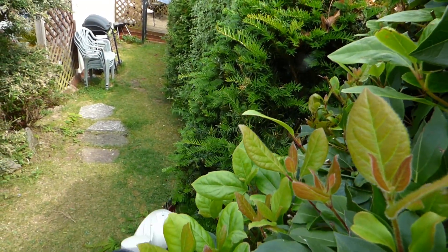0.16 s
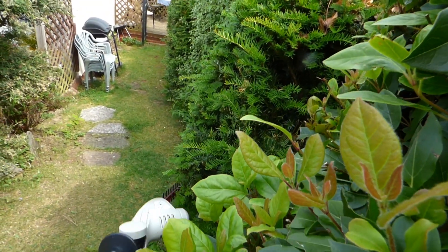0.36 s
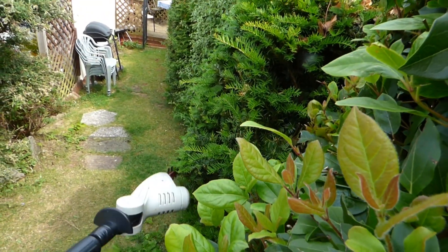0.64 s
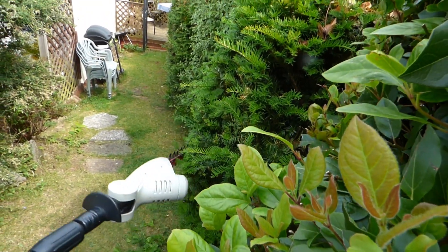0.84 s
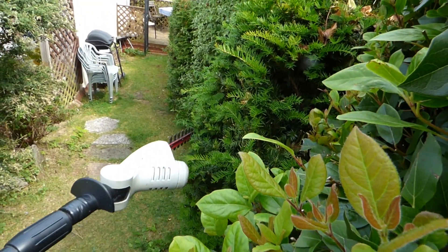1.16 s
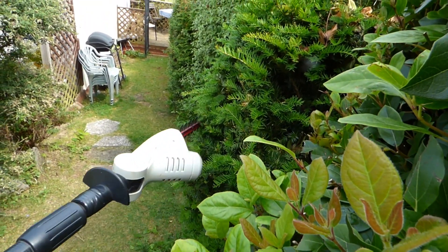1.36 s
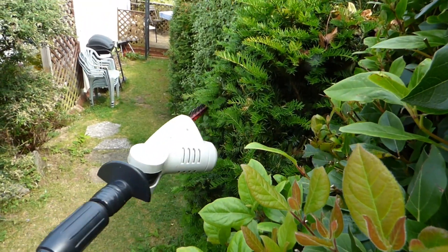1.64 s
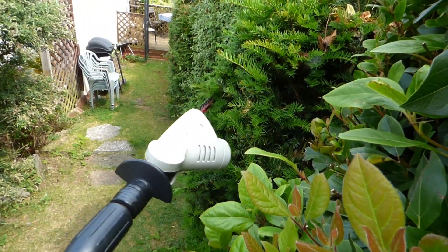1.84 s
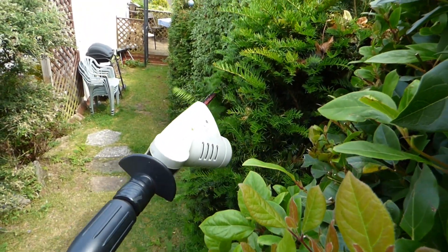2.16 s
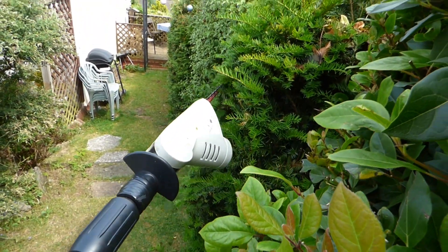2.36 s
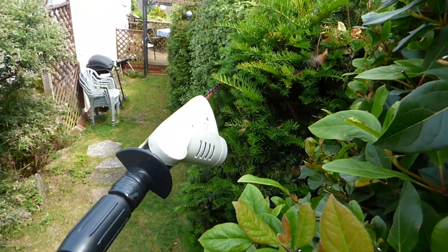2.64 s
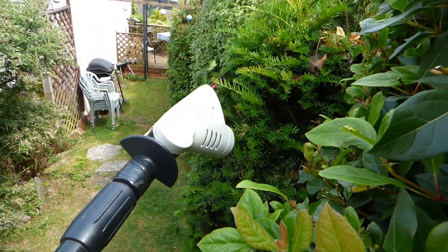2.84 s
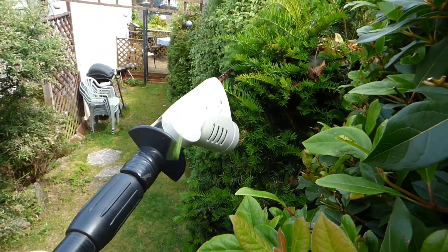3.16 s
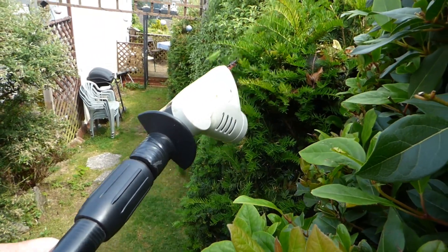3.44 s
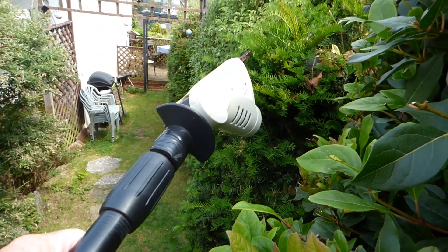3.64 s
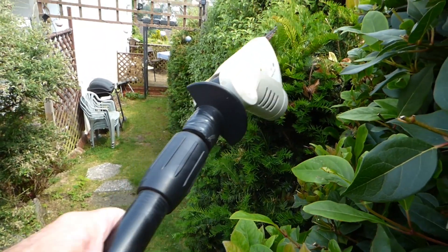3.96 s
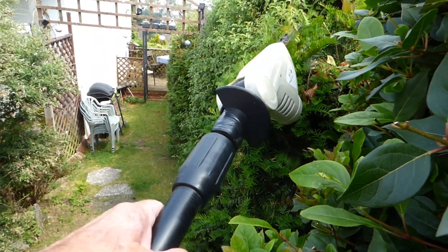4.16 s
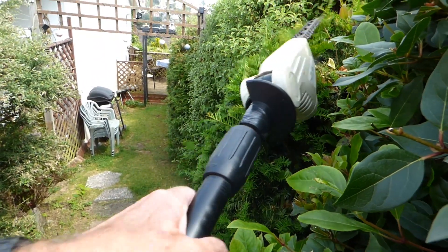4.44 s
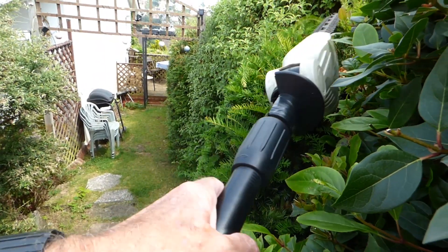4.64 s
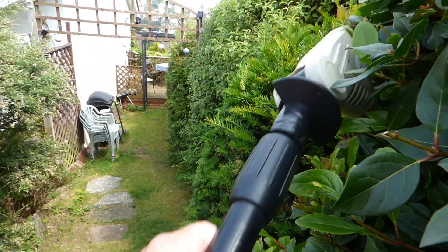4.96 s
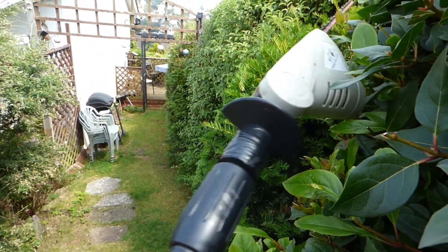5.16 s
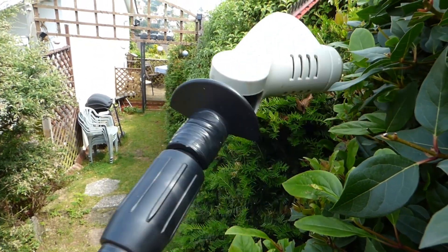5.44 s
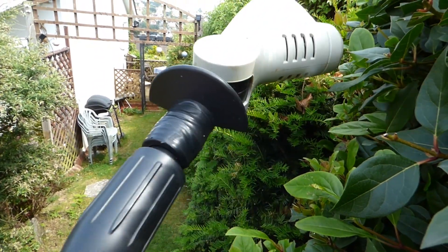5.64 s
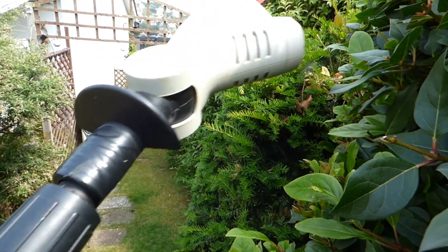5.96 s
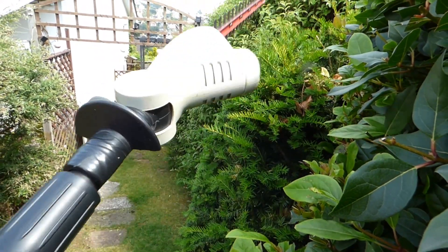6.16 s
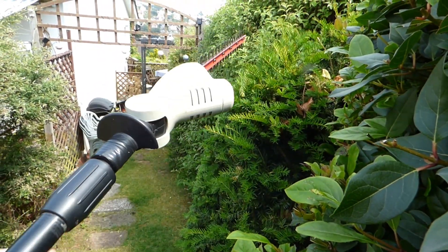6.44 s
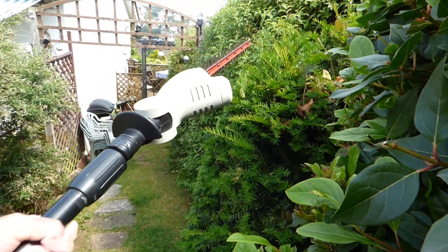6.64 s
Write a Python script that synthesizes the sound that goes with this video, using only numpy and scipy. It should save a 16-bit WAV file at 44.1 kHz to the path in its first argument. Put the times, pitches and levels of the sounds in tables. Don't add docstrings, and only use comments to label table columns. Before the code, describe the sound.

An electric pole hedge trimmer chatters loudly close by, is released, slows to a squeaky halt, its switch clicks, and it starts again.

```python
import sys
import numpy as np
from scipy import signal
from scipy.fft import rfft, irfft, next_fast_len
from scipy.io import wavfile
from scipy.ndimage import uniform_filter1d

SR = 44100
rng = np.random.default_rng(int(sys.argv[2]) if len(sys.argv) > 2 else 0)


def unload_wav(signal):
    wavfile.write(
        sys.argv[1],
        SR,
        np.round(np.clip(np.atleast_2d(signal).T, -1, 1) * 32767).astype(np.int16),
    )


def invert_db(level):
    return 10 ** (np.asarray(level, dtype=float) / 20)


N = 299880
RESTART_S = 6.563


def unit(x):
    return x / np.sqrt(np.mean(x ** 2) + 1e-20)


def along(points, hz):
    f, v = np.transpose(points)
    return np.interp(np.log(hz + 1), np.log(f + 1), v)


def curves(rows, at_s):
    s, *columns = np.transpose(rows)
    return [np.interp(at_s, s, column) for column in columns]


def filtered(x, response):
    m = next_fast_len(N + 8192)
    return irfft(rfft(x, m) * response(np.fft.rfftfreq(m, 1 / SR)), m)[..., :N]


def modes(table, size=4096):
    f = np.fft.rfftfreq(size, 1 / SR)
    power = 0
    for centre, width, db in table:
        resonance = (f * width) ** 2 / ((centre ** 2 - f ** 2) ** 2 + (f * width) ** 2)
        skirt = (f / centre) ** 2 / (1 + (f / centre) ** 4)
        power = power + invert_db(2 * db) * resonance * skirt
    cepstrum = irfft(np.log(power + 1e-9) / 2)
    cepstrum[1:size // 2] *= 2
    cepstrum[size // 2 + 1:] = 0
    return irfft(np.exp(rfft(cepstrum)))[:size // 2]


def blows(s, size):
    i = np.clip(np.round(s * SR), 0, N).astype(int)
    return np.bincount(i, size, N + 1)[:N]


def dying(x, seconds):
    return signal.lfilter([1], [1, -np.exp(-1 / (seconds * SR))], x)


def tone(s, length, hz, db):
    t = np.arange(N) / SR
    waver = .04 * np.cumsum(rng.standard_normal(N))
    swell = np.sin(np.pi * np.clip((t - s) / length, 0, 1))
    return invert_db(db) * swell * np.sin(2 * np.pi * hz * t + waver)


# time_s, strokes_done
STROKE_COUNT = [(0, -1.18), (.35, 14.66), (1.55, 68.6), (2.15, 95.3), (2.55, 112.77), (2.95, 130.4),
                (3.75, 165.3), (4.15, 183.2), (5.1093, 226.7)]


def motion(t):
    free_rate, friction_rate = 45.45, 62.68
    drag_s, spin_up_s = 2.1425, .053
    release_s, since = STROKE_COUNT[-1][0], np.clip(t - RESTART_S, 0, None)
    decay = np.exp(-(t - release_s).clip(0) / drag_s)
    coast = ((free_rate + friction_rate) * decay - friction_rate) / free_rate
    share = np.where(since > 0, 1 - np.exp(-since / spin_up_s), coast.clip(1e-6))
    held_rate = np.gradient(curves(STROKE_COUNT, t)[0], t)
    rate = np.where(t < release_s, held_rate, free_rate * share)
    return STROKE_COUNT[0][1] + np.cumsum(rate) / SR, share


# level_db, change_vents_away_db, speed_law (dB per dB), standstill_loss_db
PART_LEVELS = [(-25.5, -6.5, 0.76, 22), (-34, -6.5, 0.93, 12), (-26.5, -2, 0.91, 30), (-27.5, 6, 1.7, 7)]
# time_s, casing_db, blades_db
RESTART_LOAD = [(6.56, 0, 0), (6.6, 2, -3), (6.7, 2, -3), (6.8, 2.5, -2)]


def loudness(t, share, away, near_db):
    inrush_s, stall_share = 0.011, 0.15
    gear_hiss_full_db, gear_hiss_law = -32.5, 1.5
    halt_s, halt_fade_s, halt_db = 6.2, 0.02, 27
    since = np.clip(t - RESTART_S, 0, None)
    effort = np.maximum(share, 1 - np.exp(-since / inrush_s))
    speed_db = 20 * np.log10(effort)
    stuck = np.clip(1 - effort / stall_share, 0, 1)
    near_db = near_db - halt_db * np.clip((t - halt_s) / halt_fade_s, 0, 1) * (t < RESTART_S)
    parts = [db + near_db + turn_db * away + law * speed_db - stall_db * stuck
             for db, turn_db, law, stall_db in PART_LEVELS]
    boom_db, hiss_db = (t > RESTART_S) * np.array(curves(RESTART_LOAD, t))
    parts = [parts[0] + boom_db, parts[1], parts[2] + hiss_db, parts[3] + hiss_db]
    return parts, gear_hiss_full_db + near_db + gear_hiss_law * speed_db


# time_s, early_knock_db
GEAR_PLAY = [(0, -5.5), (.4, -1), (1.05, -2), (1.2, 4.5), (1.32, -1), (1.62, -12), (2.2, -24), (3, -8),
             (3.7, -2), (3.9, -1.5), (5.2, 3), (5.4, 0), (6.6, -1), (6.68, 7), (6.73, 3), (6.74, 11),
             (6.77, 7), (6.79, -3)]
# time_s, peak_db, hush_before_db
HARD_REVERSALS = [(0.226, -4, -1), (0.49, -4.5, -13), (0.802, -5.5, 7), (1.049, -5, 4.5),
                  (1.1372, -3.5, -1), (1.336, -1, 2), (1.403, -2.5, 4), (1.648, -1, 17), (1.6934, -2, 9),
                  (1.7384, -1.5, 21), (1.783, -1, 1), (1.827, -3, 14), (1.8739, -3, 0.5), (1.917, -3.5, -1),
                  (1.9624, -3, 5), (2.008, -2, 15), (2.0986, -8, 4), (2.144, -4.5, 18), (2.2337, -8.5, 4),
                  (2.325, -5.5, 7.5), (2.4172, -5.5, 5), (2.601, -4, -3), (2.6455, -5, 4), (2.669, -5, 7),
                  (2.6908, -3.5, -1), (2.7364, -4.5, -10), (2.781, -2.5, 3), (2.8728, -6.5, 7),
                  (2.9644, -4.5, 7), (3.0092, -6.5, 6), (3.0324, -3.5, 2), (3.055, -2.5, -13),
                  (3.112, -5, 4), (3.1482, -9, 13), (3.1936, -4, 4.5), (3.2157, -7, 1), (3.3303, -5, -8),
                  (3.377, -9.5, -1), (3.423, -8.5, 6), (3.4682, -2.5, -4), (3.5598, -5, 1), (3.583, -5, 0),
                  (3.6294, -5, 3), (3.6528, -6, -1), (3.7662, -7.5, 13), (3.7878, -6.5, 15),
                  (3.811, -6, 11), (3.8561, -5.5, 11), (3.9008, -5, 1), (4.055, -5.5, 0), (4.145, -4.5, 1),
                  (4.2112, -4.5, 8), (4.2781, -3.5, 17), (4.3226, -6, 11.5), (4.367, -4, 6),
                  (4.4552, -6.5, 8), (4.632, -6.5, 4), (4.9608, -5.5, -7)]
# time_s, peak_db, hush_before_db
COASTING_REVERSALS = [(5.3423, -9, 6), (5.3724, -7, 14), (5.403, -7, 14), (5.4374, -6.5, -3),
                      (5.4705, -9, 1), (5.5086, -6, 1), (5.5447, -4, 24), (5.5843, -5, 26),
                      (5.6269, -6.5, 0.5), (5.677, -5.5, 8.5), (5.7257, -9, 1), (5.784, -9.5, 3),
                      (5.849, -11.5, 7), (5.933, -11, 5), (6.043, -13.5, 7.5), (6.051, -24, 0),
                      (6.6266, -13, 0), (6.6529, -7.5, -1), (6.679, -5.5, 3)]
# time_s, peak_db, hush_before_db
STICK_SLIP = [
    (6.099, -25.5, 2),
    (6.191, -58, 0),
]
# time_s, peak_db, hush_before_db
GEAR_CATCH = [
    (6.572, -23, 6),
]
# time_s, peak_db, hush_before_db
RESTART_REVERSALS = [(6.7039, -7.5, -0.5), (6.7275, -8, 2), (6.7511, -7.5, -2), (6.772, -8.5, -3),
                     (6.7955, -8, 0.5)]


def knocks(when, done, share, blade_db):
    stroke = np.arange(-1, int(done[-1]) + 2)
    chance = rng.standard_normal((len(stroke), 8)).clip(-2, 2)

    def at(fraction):
        return np.interp(stroke + fraction, done, when, -1, N)

    beat_s = at(0)
    early_db = curves(GEAR_PLAY, beat_s)[0]
    slowed = 1 - np.interp(beat_s, when, share)
    main_db = np.where(beat_s > RESTART_S, -6 - 3 * slowed, 3.1 - 3 * slowed)
    odd_db = -0.43 + 0.035 * early_db - 2 * slowed
    mid_db = np.minimum(-8.5 - 1.3 * early_db, -2)
    main_s = at(.018 * chance[:, 0])
    main_db = main_db + odd_db * (-1.) ** stroke + 1.1 * chance[:, 1]

    hush_db, offbeats = np.zeros(len(stroke)), np.zeros(N)
    listed = HARD_REVERSALS + COASTING_REVERSALS + STICK_SLIP + GEAR_CATCH + RESTART_REVERSALS
    for s, db, quiet_db in listed:
        k = np.argmin(np.abs(beat_s - s))
        blow_db = db - np.interp(s, when, blade_db) - 19.5
        if abs(beat_s[k] - s) > .009:
            offbeats[round(s * SR)] = invert_db(blow_db)
            continue
        main_s[k], main_db[k], hush_db[k] = s, blow_db, abs(quiet_db)
        early_db[k] -= 8 * (s < RESTART_REVERSALS[0][0])

    early_s = main_s - beat_s + at(-.26 + .025 * chance[:, 2])
    early = blows(early_s, invert_db(early_db + 2.2 * chance[:, 3]))
    slow = np.clip(at(0.9) - beat_s - .03, 0, .07)
    rebound_s = main_s + 0.00396 + 0.074 * slow + 0.00122 * chance[:, 4]
    rebound = blows(rebound_s, invert_db(main_db - 9.5 + 91 * slow + 3.0 * chance[:, 5]))
    mid_s = at(.55 + .05 * chance[:, 6])
    mid_db = mid_db - 9 * (at(.55) > RESTART_S)
    mid = blows(mid_s, invert_db(mid_db + 2.2 * chance[:, 7]))
    train = blows(main_s, invert_db(main_db)) + rebound + offbeats

    free_s = main_s - 0.17 * np.clip(beat_s - at(-1), 0, .1)
    edges_s = np.column_stack([free_s - .003, free_s, main_s - .0004, main_s])
    depth_db = np.outer(hush_db, [0, .3, .45, 0])
    hush = invert_db(-np.interp(when, edges_s.ravel(), depth_db.ravel()))
    train[0] = early[0] = mid[0] = 0
    gears = train + early + 0.48 * mid
    blades = train + np.where(when > RESTART_S, .3, .7) * early + mid
    return gears, blades, hush


def drive(train, part, hush, slide_db, tail_s, crack_db, grit_db):
    speed = np.sqrt(np.abs(np.sin(np.pi * part)))
    scrape = invert_db(slide_db - 3.9 * part) * (2.16 + speed)
    burst = dying(dying(train ** 2, tail_s), 0.00079) / (0.0004 * SR)
    shake = np.sqrt(scrape ** 2 + burst)
    grit = (rng.random(N) < .05) * invert_db(3.1 * rng.exponential(size=N).clip(0, 3))
    force = hush * shake * (1 + invert_db(grit_db) * unit(grit)) * rng.standard_normal((2, N))
    return force + invert_db(crack_db) * np.array([train, np.roll(train, 90)])


def sounded(force, table, side):
    table, m = np.array(table), next_fast_len(N + 2048)
    spectrum = rfft(force, m)
    out = 0
    for k in range(3):
        answer = irfft(spectrum * rfft(modes(table[:, [0, 1, 2 + k]]), m), m)[:, :N]
        out = out + np.clip(1 - np.abs(side - k), 0, 1) * answer
    return out / np.sqrt(np.abs(uniform_filter1d(out * out, size=SR // 5)) + 1e-12)


# centre_hz, width_hz, behind_db, beside_db, below_db
CASING_MODES = [(1125, 230, -10, -12.5, -9), (1257, 40, -2.5, -5.5, 0.5), (1353, 63, 1, 1, -1.5),
                (1514, 71, -4.5, -3, -3), (1675, 113, -13, -3.5, -1.5), (1780, 110, -6.5, -4, -5),
                (1925, 84, -10.5, -16.5, 0), (2110, 37, -8, -9, -23)]
POLE_MODES = [(259, 170, -15, -6.5, -2), (329, 47, -9.5, -23, -7), (467, 41, -1.5, 0, 2.5),
              (604, 177, -0.5, -1.5, 2.5), (842, 123, -29.5, 6.5, 1), (930, 44, -36, -28, 1.5)]
BLADE_MODES = [(2360, 210, 6, -6, -4), (2606, 380, 5.5, -7.5, -5), (3046, 57, 10, -8, -3),
               (3610, 1030, 5, -12.5, -4), (4090, 360, 2, -10, -4.5), (4890, 360, 8.5, -6.5, -2),
               (5370, 210, 2.5, -4, -10), (6100, 840, 1.5, -15, -9)]
TEETH_MODES = [(6380, 1300, -2.5, -5, -5), (7290, 290, 3, -19, -2.5), (7830, 170, 3, 1, 0),
               (8520, 450, -2.5, -1.5, -0.5), (9270, 970, 0.5, -2, -0.5), (10420, 1600, -1.5, -5.5, -5),
               (11800, 1000, -10, -7, -5.5), (13700, 1200, -11, -12.5, -27)]
# frequency_hz, density_db (per Hz)
GEAR_HISS = [(5000, -23), (7200, 1), (8200, 1), (9500, -4), (11000, -2.5), (15000, -17)]
# order (multiple of the stroke rate), level_db (re pole)
POLE_HUM = [(4, -30), (4.5, -26), (5, -24), (5.5, -13), (6, -15), (6.5, -18), (7, -21), (8, -24), (10, -26),
            (11, -18)]
# time_s, order_5.5_gain_db, order_6_gain_db
GRIP_GAINS = [(0, -8, -15), (.7, -7, 3), (1.6, -16, 10), (1.8, 5, -8), (2.4, 2, 9), (3.1, 9, -11),
              (3.4, -5, 2), (3.85, -6, -1), (4, -6, 10), (5.1, -4.5, 4.5), (5.5, 1, 5), (6.8, 0, 11)]
# time_s, side_shown (0-2), vents_away (0-1), nearness_db, left_right_db
HEAD_HOLD = [(0, 0.031, 0, -0.9, 2.3), (.45, 0.36, 0.02, -0.44, 2.5), (1.2, 0.35, 0.14, -0.3, 1.5),
             (1.8, 1.04, 0.17, 0.3, .6), (2.4, 0.78, 0.33, -0.5, 0.5), (3, 0.89, 0.35, 0, .45),
             (3.6, 1.5, 0.61, -1.1, 0.09), (4.2, 1.43, 0.47, -1.56, -1.2), (4.6, 1.76, 0.76, -2.5, -2.5),
             (4.85, 2.3, 0.6, -1.1, -3), (5.2, 1.5, 0.6, -0.85, -2), (5.6, 1.3, 0.43, 3, -1),
             (6.05, 2.3, 1, 8, 0), (6.2, 1.8, 0.6, 7.5, 0.5), (6.56, 1.24, 0.25, -8, 3),
             (6.6, 2.1, 0.6, 3, 0.5), (6.8, 2, 0.63, 1.5, 0.5)]


def trimmer():
    t = np.arange(N) / SR
    done, share = motion(t)
    side, away, near_db, pan_db = curves(HEAD_HOLD, t)
    (casing_db, pole_db, blade_db, teeth_db), gear_hiss_db = loudness(t, share, away, near_db)
    part = done % 1
    gears, blades, hush = knocks(t, done, share, blade_db)

    rocking = 0.26 * rng.standard_normal(400)[np.floor(done + .3).astype(int) + 2]
    rocked = uniform_filter1d(np.clip(side + rocking, 0, 2), size=90)

    steel_force = drive(blades, part, hush, slide_db=-9.5, tail_s=.0058, crack_db=2.8, grit_db=-5.5)
    casing_force = drive(gears, part, hush, slide_db=-13, tail_s=.0016, crack_db=23, grit_db=-3)
    pole_force = drive(gears, part, hush, slide_db=-11.5, tail_s=.0055, crack_db=5.6, grit_db=-6.5)
    teeth_force = drive(blades, part, hush, slide_db=-17, tail_s=.004, crack_db=0, grit_db=-31)
    casing = sounded(casing_force + .2 * steel_force, CASING_MODES, rocked)
    pole = sounded(pole_force, POLE_MODES, side)
    blade = sounded(steel_force, BLADE_MODES, side)
    teeth = sounded(teeth_force, TEETH_MODES, side)

    grip_db = dict(zip((5.5, 6), curves(GRIP_GAINS, t)))
    drift = 0.0022 * np.sqrt(64) * np.cumsum(rng.standard_normal((len(POLE_HUM), N // 64 + 2)), axis=1)
    hum = 0
    for (order, db), walk in zip(POLE_HUM, drift):
        phase = 2 * np.pi * order * done + np.interp(t * SR / 64, np.arange(len(walk)), walk)
        hum = hum + invert_db(db - 7.5 + grip_db.get(order, 0)) * np.sin(phase)
    hum_db = pole_db + np.minimum(gear_hiss_db + 45, 0)
    gear_hiss = unit(filtered(rng.standard_normal((2, N)), lambda f: invert_db(along(GEAR_HISS, f))))

    head = invert_db(casing_db) * casing + invert_db(pole_db) * pole + invert_db(blade_db) * blade + invert_db(teeth_db) * teeth
    return head + invert_db(gear_hiss_db) * hush * gear_hiss + invert_db(hum_db) * hum * [[1], [0]], pan_db


# centre_hz, width_hz, depth (0-1)
SHADOW_DIPS = [(387, 41, .6), (2646, 62, 0.68), (3245, 96, 0.68)]


def shadowed(x):
    away = curves(HEAD_HOLD, np.arange(N) / SR)[1]

    def band(f):
        return sum(np.clip(depth, 0, 1) / (1 + (2 * (f - centre) / width) ** 2)
                   for centre, width, depth in SHADOW_DIPS)

    return x - np.clip(1.22 * away, 0, 1) * filtered(x, band)


def through_leaves(x, depth_db):
    z = signal.stft(x, nperseg=256)[2]
    field = uniform_filter1d(rng.standard_normal(z.shape[1:]), size=2, axis=0)
    field = uniform_filter1d(field, size=90, axis=1)
    gain = invert_db(depth_db * unit(uniform_filter1d(field, size=40, axis=1)))
    return signal.istft(z * gain / np.sqrt(np.mean(gain ** 2)), nperseg=256)[1][:, :N]


# frequency_hz, density_db (per Hz)
GARDEN_AIR = [(20, -3), (45, -28), (110, -25), (220, -19), (420, -26.5), (1100, -24), (2100, -34),
              (9000, -38.5), (15000, -54)]


def garden():
    noise = rng.standard_normal((3, N))
    both, left, right = filtered(noise, lambda f: invert_db(along(GARDEN_AIR, f)))
    air = np.array([both + 1.16 * left, both + 0.53 * right])
    return invert_db(-62.5) * air / np.std(filtered(both, lambda f: f > 300)) * 0.49


# time_s, peak_db
LOW_PUFFS = [(0.049, -64), (0.158, -55), (0.219, -57), (0.314, -53.5), (0.399, -56), (0.613, -57),
             (0.894, -60.5), (1.056, -56), (1.198, -55), (1.317, -58), (1.401, -57), (1.646, -53),
             (1.717, -50.5), (1.945, -53), (2.049, -56), (2.193, -58), (2.49, -56), (2.592, -51),
             (2.666, -51.5), (2.85, -51), (2.958, -52), (3.028, -53.5), (3.168, -52.5), (3.393, -53.5),
             (3.568, -52.5), (3.669, -72), (3.753, -52), (3.848, -55), (3.899, -55), (4.318, -52),
             (4.432, -54), (4.55, -69), (4.69, -55), (4.816, -57), (4.898, -61.5), (5.114, -55),
             (5.384, -52), (5.524, -50), (5.599, -59), (5.665, -53), (5.78, -52), (5.929, -56),
             (6.559, -55), (6.779, -49)]


def low_puffs():
    s, db = np.transpose(LOW_PUFFS)

    def puff(size, seconds):
        return dying(dying(blows(s, size), seconds), seconds) / (0.27 * seconds * SR)

    def band(lo_hz, hi_hz):
        noise = rng.standard_normal((2, N))
        return unit(filtered(noise, lambda f: f ** 4 / (f ** 4 + lo_hz ** 4) / (1 + (f / hi_hz) ** 4)))

    strong = np.clip((db + 57) / 10, .1, 1)
    deep = puff(invert_db(db) * strong, .019) * band(lo_hz=25, hi_hz=110)
    dull = puff(invert_db(db), .018) * band(lo_hz=115, hi_hz=190)
    return (invert_db(-5) * deep + invert_db(-9) * dull) * [[1], [3.5]]


# start_s, length_s, pitch_hz, level_db
STEEL_SQUEAKS = [(6.003, .022, 3830, -39), (6.125, .05, 3620, -52), (6.134, .027, 7250, -48),
                 (6.125, .045, 4950, -54), (6.105, .06, 1250, -43), (6.15, .075, 1230, -47),
                 (5.985, .04, 1580, -34), (6.2, .022, 700, -62), (6.225, .015, 1200, -68),
                 (6.242, .023, 1200, -68), (6.41, .016, 5300, -70)]


def squeaks():
    return sum(tone(*row) for row in STEEL_SQUEAKS) * [[1], [0]]


# time_s, peak_db, brightness_db
SWITCH_CLICKS = [(6.235, -50, -8), (6.28, -66, -22), (6.321, -38, -17), (6.344, -34.5, -13),
                 (6.366, -46, -30), (6.375, -41.5, -12.5), (6.393, -53, -21), (6.4, -44.5, -36),
                 (6.411, -58, -28), (6.479, -58, -24), (6.494, -54, -28), (6.562, -39.5, -11.5)]
# centre_hz, width_hz, level_db
HANDLE_MODES = [(335, 45, 2), (620, 150, -2), (900, 220, -6), (1220, 76, 0), (1670, 190, 3.5),
                (2020, 150, -4), (3570, 600, -22), (5130, 780, -14)]


def switch():
    s, db, bright_db = np.transpose(SWITCH_CLICKS)
    hit = blows(s + .0008, invert_db(db) * np.clip(-bright_db / 10 - .8, 0, 1))
    body = 4.3 * hit + dying(hit, 0.0028) * rng.standard_normal((2, N))
    tick = blows(s - .0005, invert_db(db + bright_db + 5.5))
    crack = dying(tick, 0.00183) * rng.standard_normal((2, N))
    shell = modes(HANDLE_MODES)
    ring = signal.oaconvolve(body, shell[None] / np.linalg.norm(shell), axes=1)[:, :N]
    return invert_db(2.5) * ring + filtered(crack, lambda f: f > 3500)


# start_s, length_s, pitch_hz, level_db
BIRD_PEEP = (6.452, .024, 6750, -69)


def bird():
    return tone(*BIRD_PEEP)


# frequency_hz, side_minus_mid_db
STEREO_WIDTH = [(60, -29), (200, -15.5), (380, -14), (700, -8), (1290, -13.5), (2380, -9), (8120, -10),
                (15000, -5)]


def spread(pair):
    side = filtered(pair[1], lambda f: invert_db(along(STEREO_WIDTH, f)))
    return np.array([pair[0] + side, pair[0] - side])


def scene():
    head, pan_db = trimmer()
    head = through_leaves(shadowed(head), depth_db=1.6)
    head = filtered(head, lambda f: f ** 10 / (f ** 10 + 175. ** 10))
    near = head + low_puffs() + squeaks() + switch()
    return spread(near) * invert_db(np.array([pan_db, -pan_db]) / 2) + bird() + garden()


def low_pass(x):
    return signal.sosfilt(signal.butter(12, 15880, fs=SR, output="sos"), x)


def record(dry):
    x = filtered(dry, lambda f: (f < 15800) / (1 + (f / 15500) ** 24))
    mix = x - .0031
    return low_pass(mix)


dry = scene()
out = record(dry)
unload_wav(out)
```